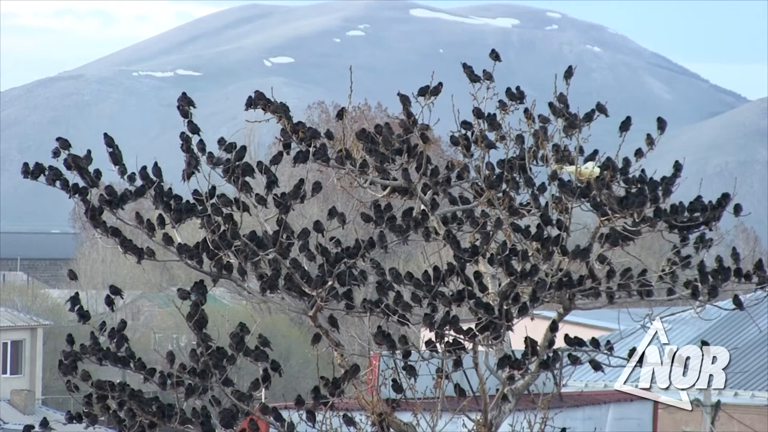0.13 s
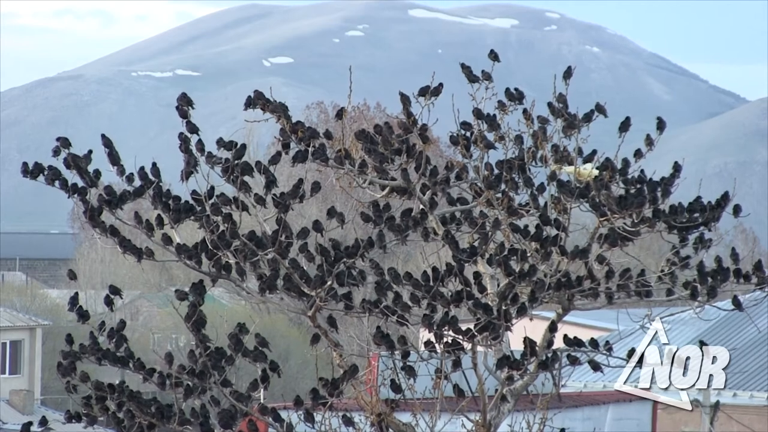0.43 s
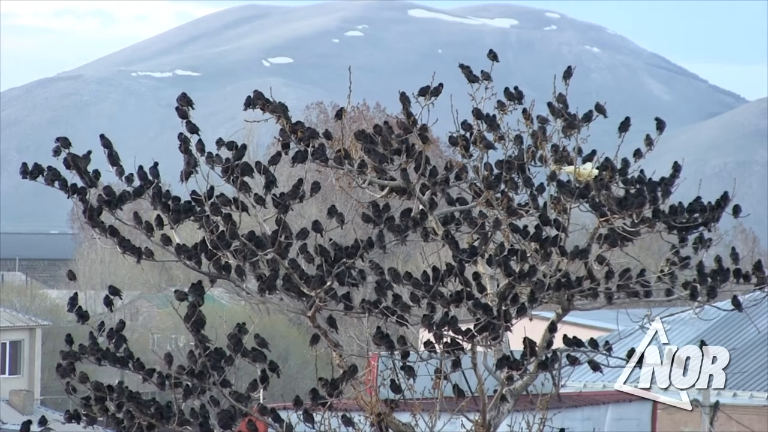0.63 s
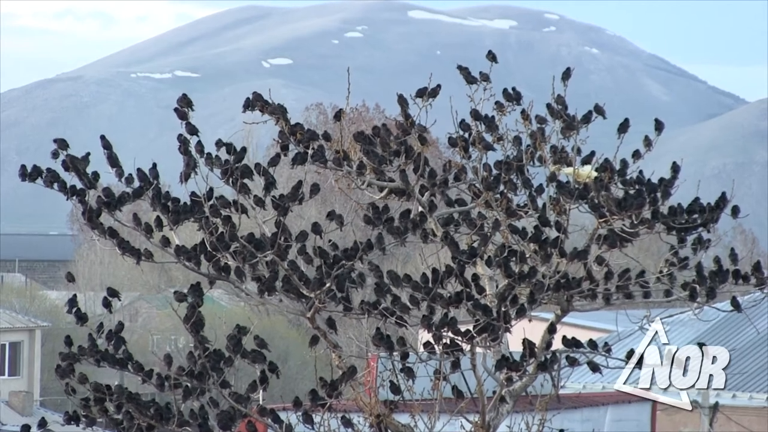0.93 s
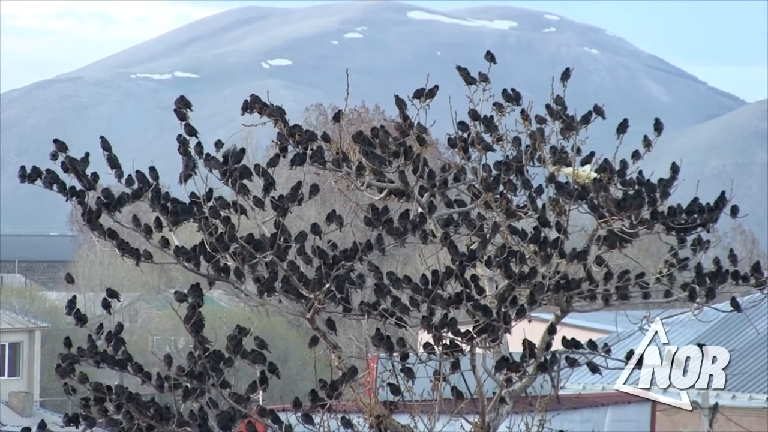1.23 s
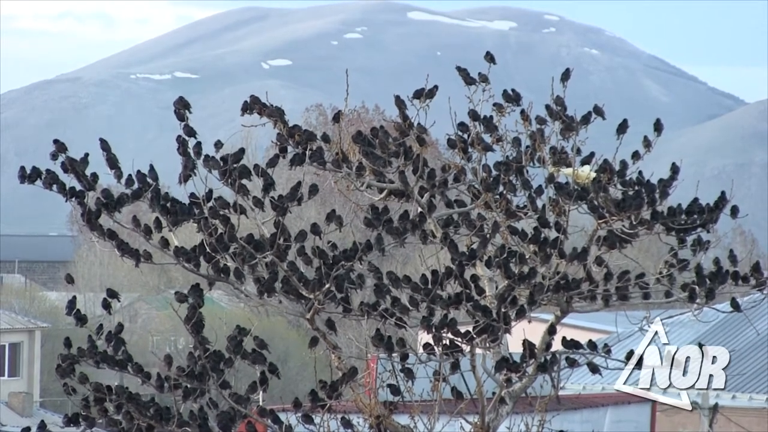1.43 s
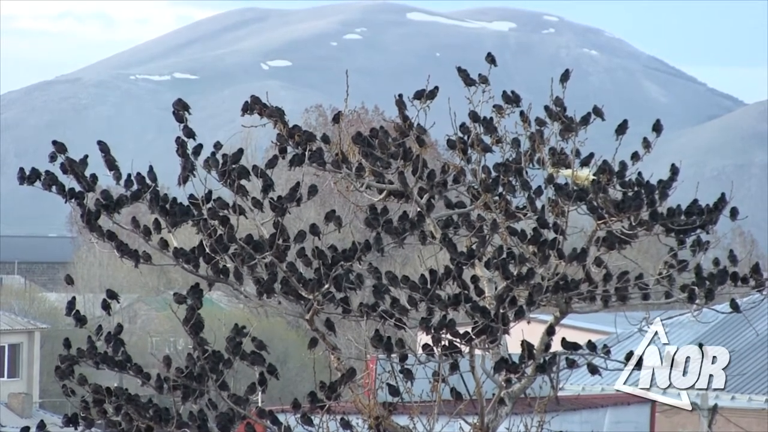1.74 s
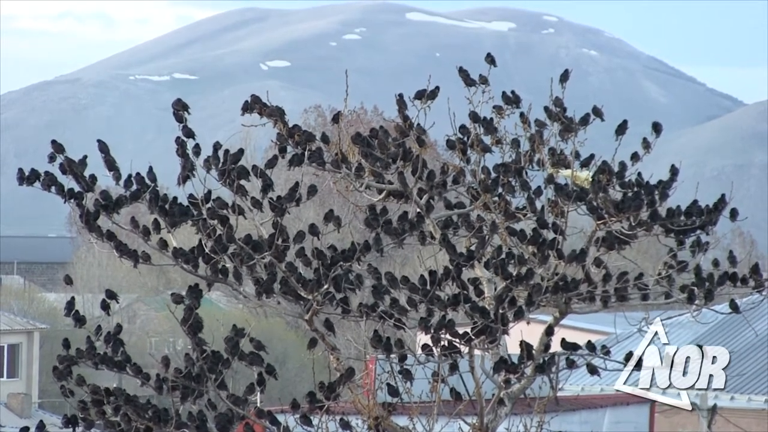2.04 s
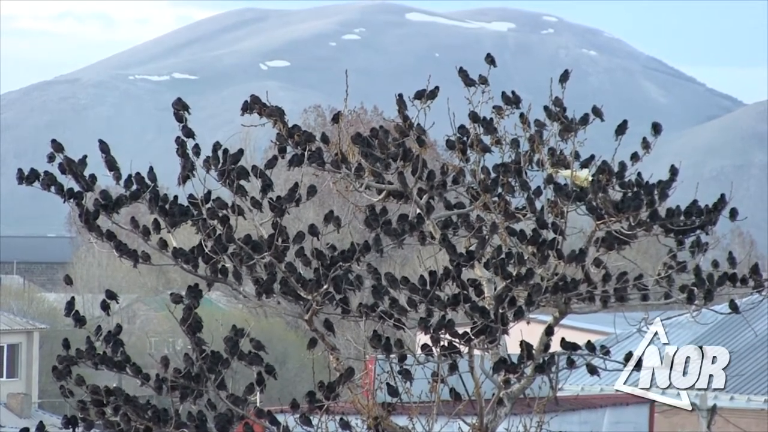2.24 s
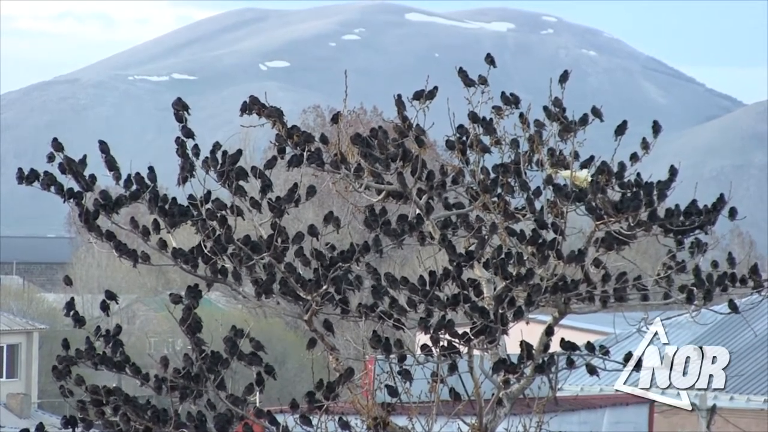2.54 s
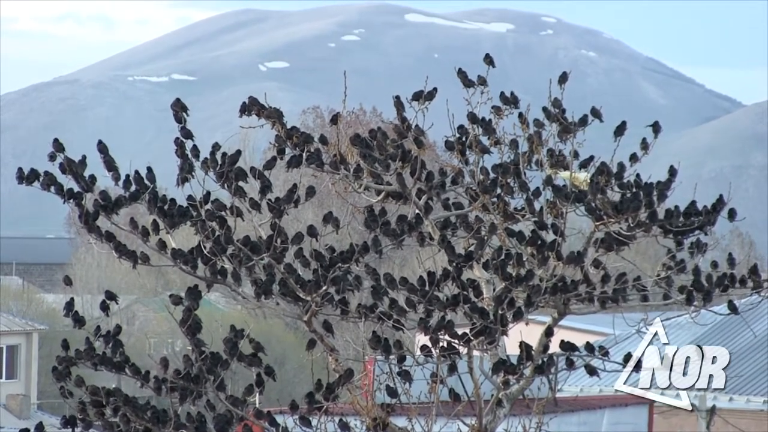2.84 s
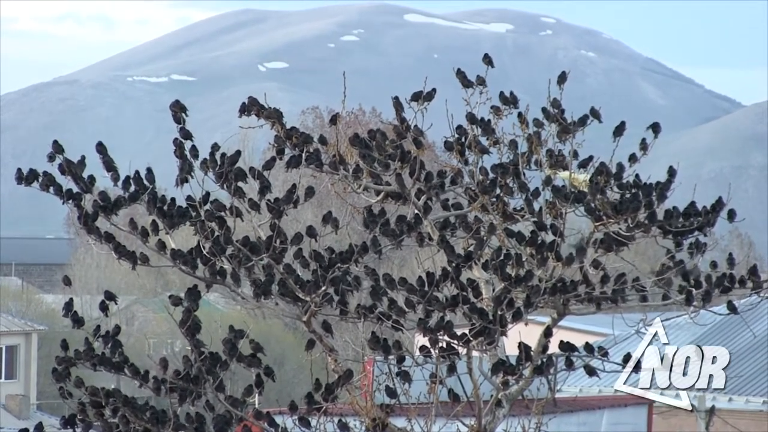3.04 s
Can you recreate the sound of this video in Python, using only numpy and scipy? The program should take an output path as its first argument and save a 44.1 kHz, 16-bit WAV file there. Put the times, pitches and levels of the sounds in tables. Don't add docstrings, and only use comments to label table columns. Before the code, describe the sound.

Hundreds of starlings whistle, chirp and rattle at once, blurring into a bright wash with a few closer notes standing out; low traffic hums far off. Outdoors, one microphone on the right, faint hiss left.

```python
import sys
import numpy as np
from scipy import signal
from scipy.fft import rfft, irfft
from scipy.io import wavfile
from scipy.ndimage import uniform_filter1d

SR = 44100
rng = np.random.default_rng(int(sys.argv[2]) if len(sys.argv) > 2 else 0)


def decibels_to_gain(level_db):
    exponent = np.asarray(level_db, float) / 20
    return 10 ** exponent


def transcribe(u):
    v = np.clip(np.atleast_2d(u).T, -1, 1)
    q = np.round(v * 32767).astype(np.int16)
    wavfile.write(sys.argv[1], SR, q)


N = 140679

# pitch in Hz, strength in dB per Hz.
HISS = [(20, 11), (150, 3), (600, -1), (2000, -2), (4000, 0), (6500, 3), (10000, -2), (14700, -4),
        (15300, -20)]
HISS_DB = -81.5

# pitch in Hz, strength in dB per Hz.
TRAFFIC = [(12, -55), (20, -36), (42, -14), (80, -24), (113, -3.5), (151, -11), (374, -9.5), (415, -13.5),
           (1200, -25.5), (1560, -60), (2640, -120)]
# pitch in Hz, width in Hz, level in dB.
ENGINE_HUMS = [(57, 7.5, -59.5), (114, 20, -58), (191, 22, -55.5), (260.5, 14.7, -62)]
# pitch in Hz, width in Hz, level in dB against the vehicle.
TYRE_TONES = [(547, 40, -2), (617, 8, -5.5), (671, 11, -4), (845, 5, -8)]
# time in seconds, level in dB.
NEARING = [
    (0.13, -58),
    (2.18, -54.5),
    (2.33, -51.5),
    (2.34, -53.5),
    (3.1, -51.5),
    (3.19, -52.5),
]
TRAFFIC_DB, TYRE_DB = -52.5, -0.5

# pitch in Hz, strength in dB per Hz.
HIGH_VOICES = [(5100, -76), (5600, -2.5), (6200, -2.5), (7000, -2.5), (8000, -3), (8700, -8), (9200, -15.5),
               (9600, -22)]
LOW_VOICES = [(600, -11), (1000, -5.5), (1800, -2.5), (2700, -1.5), (4200, -1.5), (5200, -3.5), (6500, -3),
              (9000, -11.5)]
OVERTONES = [(9000, -1), (10000, -1.5), (11500, -0.5), (13000, -3.5), (15700, -6.5), (16500, 19)]
# time in seconds, level in dB, extra of the shrillest birds in dB.
EXCITEMENT = [(.12, -51.5, 3.5), (.24, -52, 2.5), (.55, -58.5, 6), (.7, -52, -0.5), (.88, -53, 9.5),
              (1.08, -61.5, 11.5), (1.35, -47.5, -6), (1.62, -47.5, -2.5), (1.95, -53, 7), (2.2, -59, 9.5),
              (2.5, -48, -5), (2.7, -48, -9), (2.9, -48, -23), (3.19, -46.5, -22)]
# time in seconds, level in dB.
BABBLE = [
    (0.13, -49),
    (0.58, -48.5),
    (1.62, -48.5),
    (1.69, -46.5),
    (1.79, -47.5),
    (2.49, -47.5),
    (2.57, -46),
    (2.59, -47),
    (3.15, -47.5),
    (3.19, -48.5),
]
# time in seconds, level in dB.
SHRILLNESS = [
    (0.2, -74.5),
    (0.63, -76.5),
    (0.85, -72),
    (1.05, -79.5),
    (1.34, -72),
    (1.71, -75.5),
    (1.97, -71),
    (2.23, -77.5),
    (2.43, -72),
    (3.15, -77.5),
]

# start in seconds, length in
# seconds, start pitch in Hz, end pitch in Hz, level in dB.
NEAR_NOTES = [(.185, .03, 5500, 5550, -54), (.3, .035, 5650, 5450, -51), (.59, .06, 8850, 9250, -56),
              (.705, .025, 8350, 8350, -47), (.733, .04, 9000, 7400, -49), (.765, .03, 7100, 6900, -47),
              (.84, .025, 6800, 6700, -45), (.875, .035, 7800, 6900, -45), (.915, .03, 7300, 8000, -48),
              (.96, .04, 5700, 5800, -51), (.975, .075, 8700, 8300, -51), (1.083, .025, 6400, 5650, -47),
              (1.13, .135, 8300, 6750, -49), (1.19, .033, 8450, 8700, -48), (1.225, .03, 8900, 7300, -49),
              (1.255, .03, 7300, 7900, -50), (1.475, .045, 8600, 9300, -55), (1.56, .09, 6600, 5700, -51),
              (1.585, .03, 8750, 8700, -50), (1.635, .105, 8950, 9100, -58), (1.8, .03, 8500, 8800, -52),
              (1.872, .153, 8200, 6400, -45), (2.03, .085, 6600, 6150, -50), (1.955, .03, 6500, 5650, -48),
              (.4, .1, 2700, 2000, -59), (.533, .037, 4950, 4950, -49), (.61, .05, 3200, 3350, -55),
              (.815, .025, 5400, 5550, -51), (1.0, .13, 3050, 2700, -57), (1.11, .04, 6300, 5700, -50),
              (1.67, .035, 4250, 4100, -48), (1.76, .09, 2500, 2750, -55), (1.83, .045, 6350, 5900, -52),
              (1.915, .08, 3250, 3550, -58), (2.05, .03, 3050, 3150, -55), (2.18, .04, 8300, 8250, -54),
              (2.32, .04, 8350, 8250, -54), (2.503, .04, 2350, 3050, -46.5), (2.545, .045, 4250, 4170, -50),
              (2.52, .03, 6000, 7200, -52), (2.61, .05, 8100, 8600, -55), (2.63, .025, 7900, 6300, -49),
              (2.815, .03, 5650, 5950, -50), (2.905, .04, 5750, 5400, -51), (3.035, .055, 4250, 4350, -52),
              (3.025, .055, 5700, 6350, -51), (3.12, .035, 6000, 6400, -50), (3.155, .045, 3950, 4900, -48),
              (.22, .18, 2750, 2400, -61), (1.15, .2, 3400, 2500, -58.5), (2.1, .06, 6200, 5700, -54),
              (2.648, .03, 6400, 7700, -53), (3.1, .035, 8550, 8500, -55), (.57, .08, 8000, 8050, -58),
              (2.88, .05, 6200, 5900, -53), (3.065, .02, 5900, 6300, -51),
              (.117, .05, 6600, 6550, -56), (.17, .03, 6300, 5900, -53), (.26, .04, 6900, 7000, -53),
          (.35, .04, 8000, 7800, -54), (.4, .02, 6900, 6600, -53), (.435, .02, 6600, 6900, -53),
          (.48, .025, 8100, 8050, -53), (.565, .035, 3900, 4150, -56), (.59, .06, 7300, 6900, -54),
          (.63, .02, 3500, 3000, -53), (.655, .03, 2900, 3300, -55), (.665, .03, 6900, 6500, -51),
          (.8, .045, 6700, 7900, -50), (.895, .02, 7300, 6800, -48), (1.28, .025, 7900, 6900, -52),
          (1.335, .02, 5900, 6400, -52), (1.365, .02, 6900, 6700, -50), (1.37, .015, 6400, 5900, -51),
          (1.375, .015, 8000, 8200, -51), (1.39, .025, 6400, 7100, -51), (1.42, .05, 7000, 6400, -50),
          (1.45, .02, 7800, 7100, -53), (1.475, .03, 6400, 7300, -52), (1.503, .03, 7300, 6300, -51),
          (1.61, .03, 8000, 8100, -51), (1.71, .03, 3300, 2900, -52), (1.77, .05, 5600, 6300, -53),
          (1.915, .03, 8600, 8700, -53), (2.158, .015, 3900, 3700, -51), (2.16, .015, 3200, 3000, -52),
          (2.277, .02, 6250, 6200, -49), (2.48, .025, 2550, 2400, -56), (2.49, .07, 5900, 6300, -53),
          (2.715, .015, 6900, 6500, -48), (2.77, .02, 6300, 6100, -52), (2.845, .025, 2600, 2500, -57),
          (2.89, .015, 2300, 2600, -55), (2.915, .013, 4350, 4300, -50), (3.003, .02, 6100, 5800, -51),
          (3.17, .02, 3600, 4100, -54)]
# delay in seconds, level in dB.
ECHOES = [(.011, -13), (.023, -14), (.041, -16), (.067, -18)]
# start in seconds, length in seconds, top of the band in Hz.
DROPOUTS = [(.34, .03, 10300), (.62, .17, 10500), (.975, .07, 10900), (1.09, .05, 10700),
            (1.49, .25, 10300), (1.81, .075, 10500), (1.925, .03, 10300), (2.05, .04, 10100),
            (2.18, .025, 10300), (2.345, .05, 11000), (2.53, .05, 10600), (3.02, .05, 10300)]
DROPOUT_FROM_HZ = 9600

ATTACK_S, RELEASE_S, FALL_SETTLE, RISE_SETTLE = .004, .008, 3.0, .7
OCTAVE_DB = -30
WOBBLE, WOBBLES_PER_S, FLUTTER_DB, FLUTTERS_PER_S = .008, 60, 2.2, 80
NEAR_UNSTEADY, NEAR_DB = .6, 3
HIGH_HABITS = dict(length_s=.017, slide=.4, spread_db=5, rattle_share=.4)
LOW_HABITS = dict(length_s=.018, slide=.4, spread_db=4, rattle_share=.65)
HIGH_NOTES_DB, HIGH_WASH_DB, SHRILLEST_HZ = 5.8, 2.0, 7400
LOW_NOTES_DB, LOW_WASH_DB = -3.5, 5
OVERTONE_DB, OVERTONE_PATCH_DB, STREAK_DB = 11.5, 2.2, -8

OPEN_S, OPEN_RISE_S = .1165, .003


def rms_one(x):
    return x / np.sqrt(np.mean(x ** 2) + 1e-20)


def in_time(rows, order=1):
    columns = np.transpose(rows)
    return np.interp(np.arange(N) / SR, columns[0], columns[order])


def colour(x, points):
    hz, db = np.transpose(points)
    grid = np.arange(N // 2 + 1) * SR / N + 1e-3
    gain = decibels_to_gain(np.interp(np.log(grid), np.log(hz), db, left=-90, right=-90))
    return rms_one(irfft(rfft(x) * gain, N))


def drift(rate):
    knots = int(N / SR * 200) + 2
    r = np.exp(-2 * np.pi * rate / 200)
    chance = rng.standard_normal(knots + 400)
    slow = signal.lfilter([1], [1, -2 * r, r * r], chance)[400:]
    return np.interp(np.arange(N) / SR * 200, np.arange(knots), rms_one(slow))


def narrow_noise(hz, width_hz):
    r = np.exp(-np.pi * width_hz / SR)
    ring = [1, -2 * r * np.cos(2 * np.pi * hz / SR), r * r]
    return rms_one(signal.lfilter([1, 0, -1], ring, rng.standard_normal(N)))


def wash(points, patchy_db, rate):
    edges = np.geomspace(points[0][0], points[-1][0], num=13)
    white = rng.standard_normal((2, N))
    total = np.zeros(N)
    for k in range(len(edges) - 1):
        band = signal.butter(2, edges[k:k + 2], "band", fs=SR, output="sos")
        total += signal.sosfilt(band, white[k % 2]) * decibels_to_gain(patchy_db * drift(rate))
    return colour(total, points)


def idle_input():
    return decibels_to_gain(HISS_DB) * colour(rng.standard_normal(N), HISS)


def traffic():
    roar = decibels_to_gain(TRAFFIC_DB) * wash(TRAFFIC, 1.75, 7.5)
    hums = sum(decibels_to_gain(db) * narrow_noise(hz, width) for hz, width, db in ENGINE_HUMS)
    tyres = sum(decibels_to_gain(db) * narrow_noise(hz, width) for hz, width, db in TYRE_TONES)
    near_db = in_time(NEARING)
    return roar + hums + decibels_to_gain(TYRE_DB + 2 * near_db - near_db.max()) * tyres


def sing(notes, trill_hz, unsteady=1):
    tone, octave = np.zeros(N + SR), np.zeros(N + SR)
    wobble = unsteady * drift(WOBBLES_PER_S)
    flutter = unsteady * drift(FLUTTERS_PER_S)
    for (s, length, start, end, db), trill in zip(notes, trill_hz):
        i, t = int(s * SR), np.arange(int(length * SR)) / SR
        at = (i + len(t) * 7 + np.arange(len(t))) % N
        settle = FALL_SETTLE if end < start else RISE_SETTLE
        slide = (1 - np.exp(-settle * t / length)) / (1 - np.exp(-settle))
        hz = (start + (end - start) * slide) * (1 + WOBBLE * wobble[at])
        phase = 2 * np.pi * np.cumsum(hz) / SR
        shape = np.minimum(1, t / ATTACK_S) * np.minimum(1, (length - t) / RELEASE_S)
        shape = shape * decibels_to_gain(db + FLUTTER_DB * flutter[at])
        shape = shape * np.cos(np.pi * trill * t) ** 2 * np.sqrt(2)
        tone[i:i + len(t)] += shape * np.sin(phase)
        octave[i:i + len(t)] += shape * np.sin(2 * phase)
    out = tone[:N] + decibels_to_gain(OCTAVE_DB) * octave[:N]
    return out + sum(decibels_to_gain(db) * np.roll(out, int(s * SR)) for s, db in ECHOES)


def crowd(points, low_hz, high_hz, count, length_s, slide, spread_db, rattle_share):
    s, pitch, long, bend, far, kind, rate = rng.random((count, 7)).T
    end_hz = low_hz + (high_hz - low_hz) * pitch
    start_hz = end_hz * (1 + slide * (bend - .3))
    lengths = length_s * (.4 + 1.8 * long ** 2)
    notes = np.transpose([s * N / SR, lengths, start_hz, end_hz, -spread_db * far])
    trill_hz = (kind < rattle_share) * (60 + 140 * rate)
    return colour(sing(notes, trill_hz), points)


def far_voices():
    high = decibels_to_gain(HIGH_NOTES_DB) * crowd(HIGH_VOICES, 5300, 9300, count=2600, **HIGH_HABITS)
    low = decibels_to_gain(LOW_NOTES_DB) * crowd(LOW_VOICES, 1893.4, 5500, count=1500, **LOW_HABITS)
    high = high + decibels_to_gain(HIGH_WASH_DB) * wash(HIGH_VOICES, 2.2, 10)
    low = low + decibels_to_gain(LOW_WASH_DB) * wash(LOW_VOICES, 1.6, 8)
    treble = signal.butter(2, SHRILLEST_HZ, "high", fs=SR, output="sos")
    shrillest = signal.sosfiltfilt(treble, high)
    high = high + (decibels_to_gain(in_time(EXCITEMENT, order=2)) - 1) * shrillest
    return decibels_to_gain(in_time(EXCITEMENT)) * high + decibels_to_gain(in_time(BABBLE)) * low


def harsh_edge():
    streaks = crowd(OVERTONES, 9500, 15700, count=300, **HIGH_HABITS)
    blur = wash(OVERTONES, OVERTONE_PATCH_DB, 6.2)
    return decibels_to_gain(OVERTONE_DB + in_time(SHRILLNESS)) * (blur + decibels_to_gain(STREAK_DB) * streaks)


def near_birds():
    notes = NEAR_NOTES
    return decibels_to_gain(NEAR_DB) * sing(notes, np.zeros(len(notes)), NEAR_UNSTEADY)


def flock():
    return far_voices() + harsh_edge() + near_birds()


def scene():
    return np.array([idle_input(), flock() + traffic()])


def drop_quiet_band(x):
    t, hz = np.arange(N) / SR, np.arange(N // 2 + 1) * SR / N
    whole, out = rfft(x), x
    for s, length, top_hz in DROPOUTS:
        gate = uniform_filter1d(1. * (t > s) * (t < s + length), size=400)
        out = out - gate * irfft(whole * (hz > DROPOUT_FROM_HZ) * (hz < top_hz), N)
    return out


def top_cut(x):
    return signal.sosfilt(signal.butter(12, 15730, fs=SR, output="sos"), x)


def record(dry):
    fade = np.clip((np.arange(N) / SR - OPEN_S) / OPEN_RISE_S, 0, 1)
    opened = np.array([dry[0], drop_quiet_band(dry[1])]) * fade
    return top_cut(opened)


dry = scene()
out = record(dry)
transcribe(out)
```